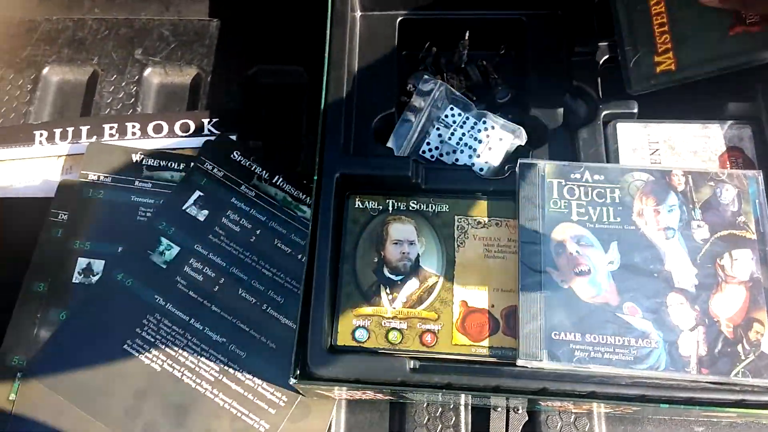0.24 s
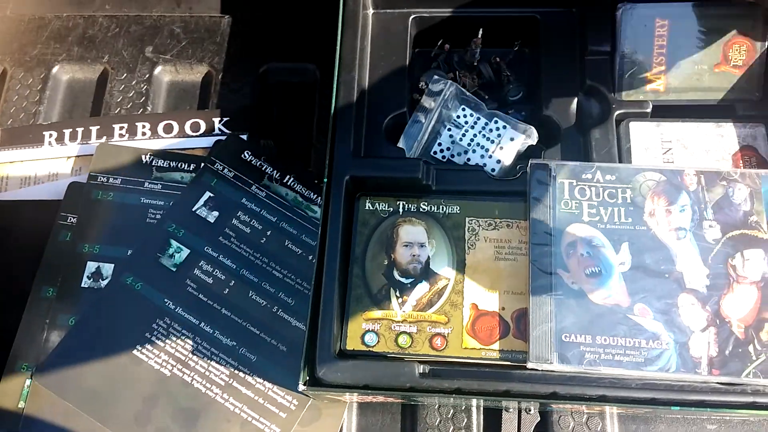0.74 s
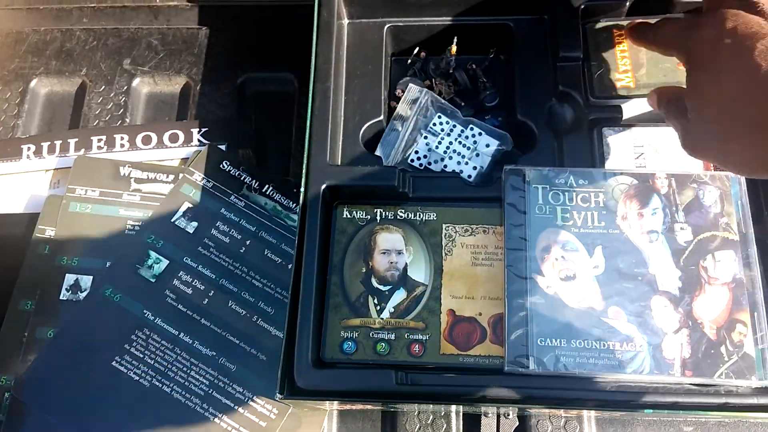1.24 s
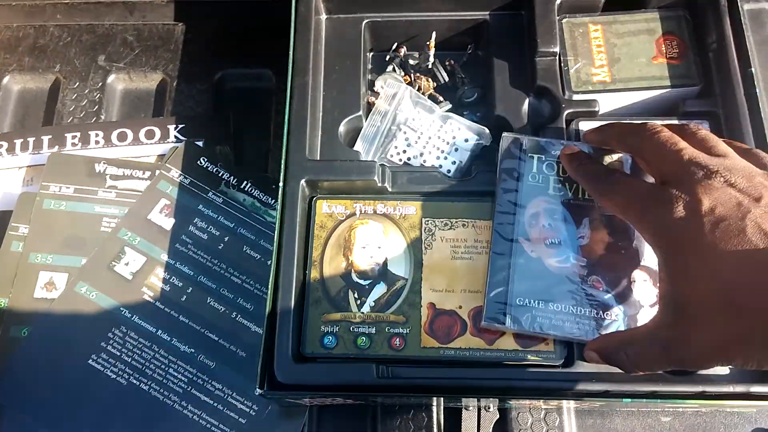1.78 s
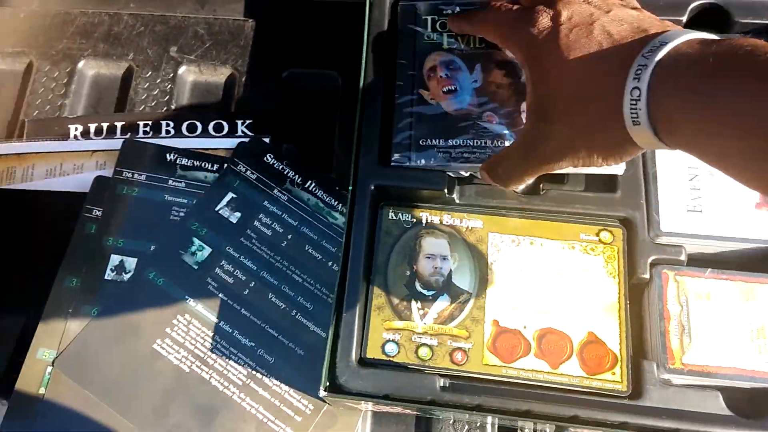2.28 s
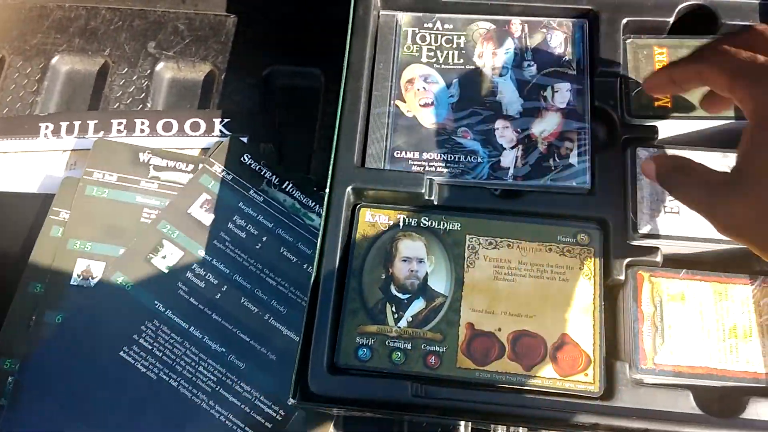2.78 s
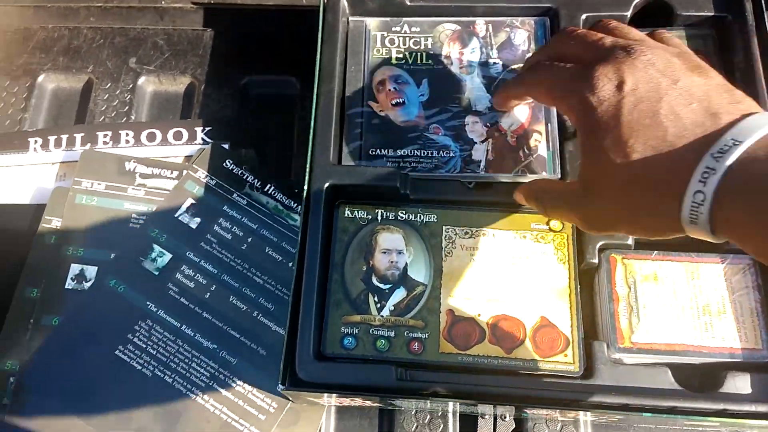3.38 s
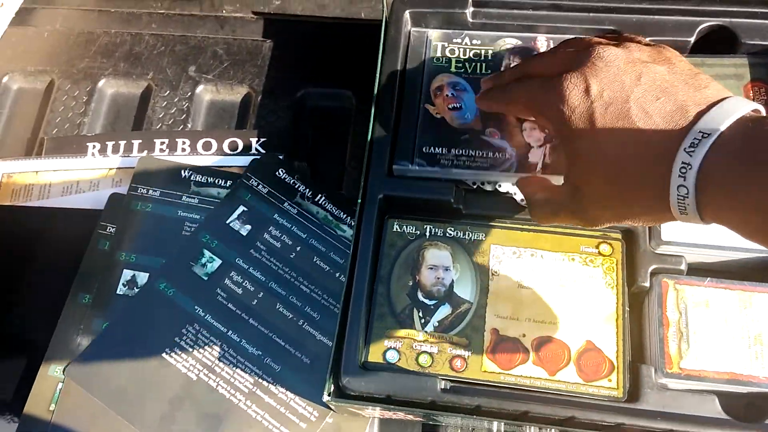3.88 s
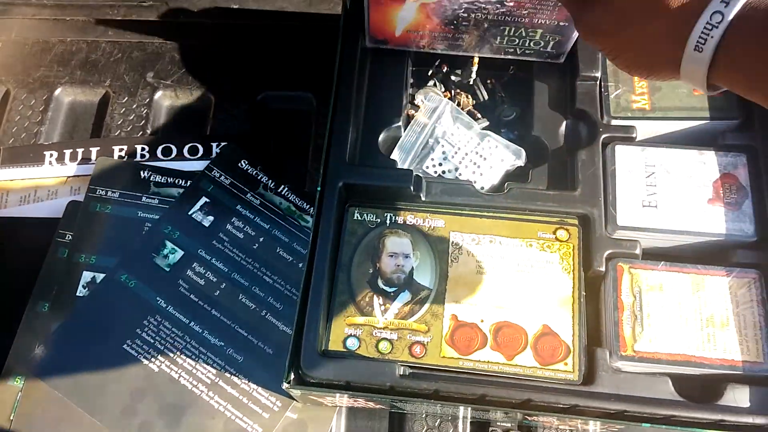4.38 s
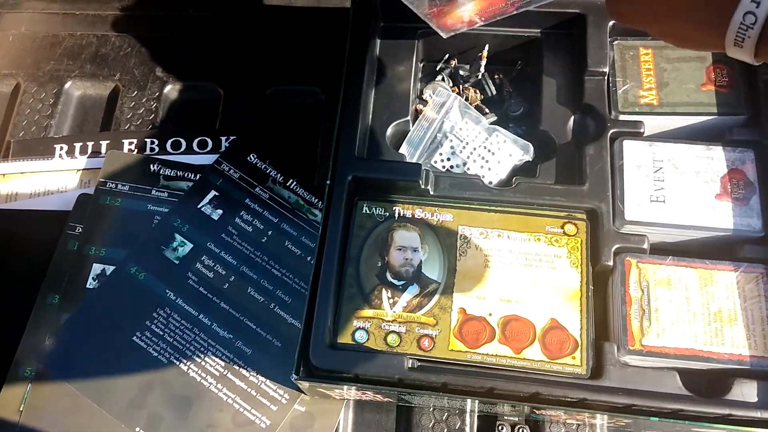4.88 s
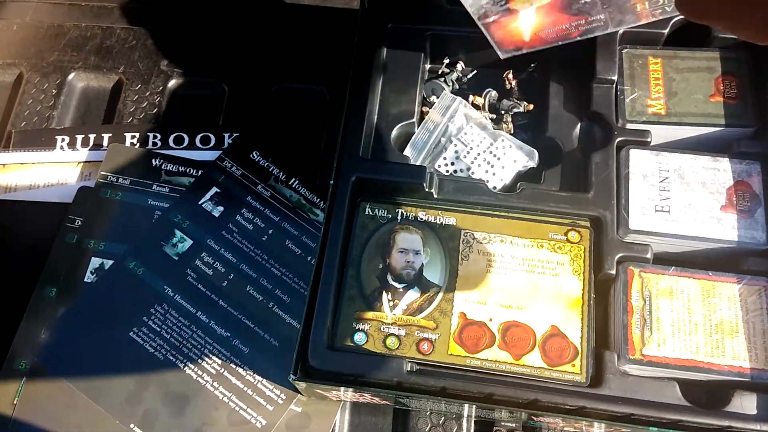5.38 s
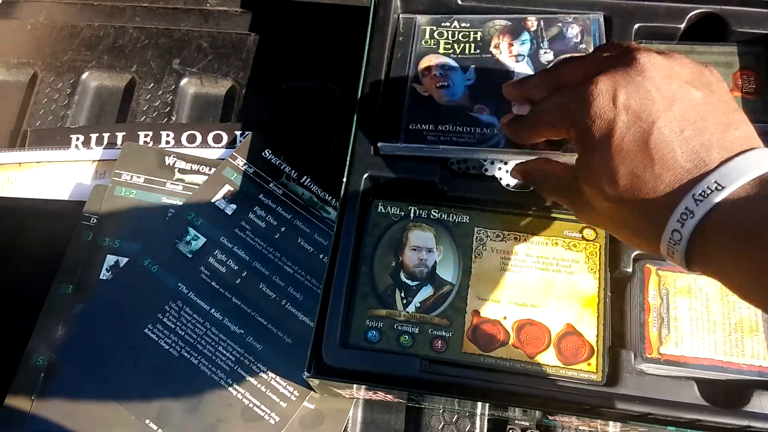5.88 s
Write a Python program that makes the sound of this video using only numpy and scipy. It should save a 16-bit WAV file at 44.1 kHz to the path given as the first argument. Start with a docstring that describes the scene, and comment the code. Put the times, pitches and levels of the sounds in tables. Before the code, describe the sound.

Hands shuffle cards and thin plastic in a box tray: sharp hollow knocks with bright snaps, dry rubbing, film crinkle, small ticks and brief squeaks. Activity comes in clusters, with a near pause midway and a dense, loud finish. Faint road noise and a few early bird chips sit far behind the close, slightly clipped phone pickup, stronger and brighter on the left.

```python
"""Card decks and a thin plastic case drop into a moulded tray outdoors, close to a phone: noisy chatter rings
tray modes, a low thump and a bright snap. Random slips make the rub, crinkle and ticks of fingers, cards and
film; gliding sines make the squeaks and the chips of a bird nearby. Far off, shaped noise gives traffic rumble,
tyre hiss and a low hum; the phone briefly turns rumble and hiss down now and then. The right microphone port
faces away and hears less, above all from about 1.4 to 3 kHz."""
import sys
import numpy as np
from scipy import signal
from scipy.fft import rfft, irfft
from scipy.io import wavfile
from scipy.ndimage import uniform_filter1d

SR = 44100
rng = np.random.default_rng(int(sys.argv[2]) if len(sys.argv) > 2 else 0)


def wav_record(signal):
    """Record a signal, one row per channel, as 16-bit PCM in the file named by sys.argv[1]."""
    frames = np.transpose(np.atleast_2d(signal))
    bounded = np.clip(frames, -1, 1)
    # unit amplitude maps onto the largest positive 16-bit level
    quanta = np.round(bounded * 32767).astype(np.int16)
    wavfile.write(sys.argv[1], SR, quanta)


N = 270774
T = np.arange(N) / SR


def undb(db):
    """Decibels to an amplitude factor."""
    return 10 ** (np.asarray(db) / 20)


def level(x, db):
    """Scale to an rms level."""
    return x * undb(db) / np.sqrt(np.mean(x ** 2))


def along(table, count):
    """Spread an (f/Hz, value) table over the bins of a transform, on a log frequency axis."""
    hz, value = np.transpose(table)
    bins_hz = np.fft.rfftfreq(count, 1 / SR)
    return np.interp(np.log(bins_hz + 1), np.log(hz), value)


def colour(x, gain):
    """Filter by one gain per frequency bin."""
    return irfft(rfft(x) * gain, N)


def band(x, hz, width):
    """One broad resonance."""
    return signal.lfilter(*signal.iirpeak(hz, hz / width, SR), x)


def humps(x, table, shift_db):
    """Broad treble resonances of thin plastic, steep at the sides; shift_db() varies each one."""
    out = 0
    for hz, width, db in table:
        resonance = band(band(x, hz, width), hz, 2 * width)
        out = out + undb(db + shift_db()) * resonance
    return out


def walk(rate):
    """Random levels, rate of them a second, slewed from one to the next; spread about 1.7."""
    k = int(SR / rate)
    held = np.repeat(rng.standard_normal(N // k + 1), k)
    return 2.08 * uniform_filter1d(held, k)[:N]


def add(out, x, s):
    """Mix a short sound in at time s."""
    i = int(s * SR)
    out[i:i + len(x)] += x[:N - i]


def whistle(s, times, hz, db):
    """A gliding sine under a soft arch."""
    t = T[:int(times[-1] * SR)]
    arch = np.sin(np.pi * t / times[-1])
    phase = 2 * np.pi * np.cumsum(np.interp(t, times, hz)) / SR
    return undb(db) * arch * np.sin(phase)


def slips(rate, spread_db):
    """Stick-slip: random clicks, rate of them a second on average, a few much larger than the rest."""
    clicks = (rng.random(N) < rate / SR) * rng.standard_normal(N)
    return clicks * undb(spread_db * np.minimum(rng.exponential(size=N), 3))


# the phone's noise suppression lets the background through, then briefly turns it down:
# (t/s, tyre hiss level/dB)
BACKGROUND = [(0, -44.5), (1.95, -46), (2.1, -58.5), (2.25, -45.5), (2.75, -44), (2.81, -54.5), (3.05, -44),
              (3.21, -55), (3.27, -50.5), (3.54, -55.5), (3.66, -45), (3.73, -67), (3.8, -44), (3.94, -57),
              (3.99, -47), (5.05, -46.5), (5.14, -53), (5.2, -47.5), (6.14, -43)]
RUMBLE_DB, RUMBLE_DIP = -42, 0.73  # rumble at the loudest; share of each dip (in dB) that it follows


def background_levels():
    """Rumble and tyre hiss levels in dB as the phone passes them; the rumble is turned down less deeply."""
    tyres_db = np.interp(T, *np.transpose(BACKGROUND))
    rumble_db = RUMBLE_DB + RUMBLE_DIP * (tyres_db - tyres_db.max())
    return rumble_db, tyres_db


# far road, spectrum shapes only: (f/Hz, relative level/dB per Hz)
RUMBLE = [(30, -9), (60, 13.5), (120, 12), (200, 2.5), (320, -26)]
TYRES = [(300, -6.5), (620, -11.5), (880, 2.5), (1150, -9), (1600, -8.5), (2500, -17.5), (16000, -48)]
# low hum at the start: (t/s by which it has faded, f/Hz, level/dB before the fade)
HUM = (0.23, 130, -31.5)


def traffic(rumble_db, tyres_db):
    """Far road: shaped noise for engine rumble and tyre hiss, narrow noise for a hum that wavers and fades."""
    rumble, tyres = (level(colour(rng.standard_normal(N), undb(along(shape, N))), 0) for shape in (RUMBLE, TYRES))
    end, hz, db = HUM
    fade = np.clip((end - T) / 0.028, 0, 1)
    hum = level(band(rng.standard_normal(N), hz, 1.3), db) * fade
    return rumble * undb(rumble_db) + tyres * undb(tyres_db) + hum


# bird nearby, one row a chip: (t/s, nominal start f/Hz, peak level/dB)
BIRD = [(0.069, 6000, -36), (0.17, 5030, -34), (0.269, 5070, -30.5), (0.372, 5100, -35.5),
        (0.472, 5280, -32), (0.81, 5240, -40)]
# the fall bends, then drops away: (t/s into the chip, nominal f/Hz)
CHIP = [(0.016, 4060), (0.026, 2800)]


def bird():
    """Falling chips, each pitched slightly differently, with a short scatter off the surroundings."""
    out = np.zeros(N)
    times, hz = np.transpose([(0.00054, 0)] + CHIP)  # the start pitch comes from BIRD
    for s, start_hz, db in BIRD:
        glide_hz = [start_hz, *hz[1:]] * (1 + 0.014 * rng.standard_normal(len(hz)))
        add(out, whistle(s, times, glide_hz, db), s)
    t = T[:8192]
    scatter = 0.016 * rng.standard_normal(len(t)) * 1000 ** (-t / 0.33)
    return out + signal.fftconvolve(out, scatter)[:N]


# close to the phone: (t/s, length/s, start f/Hz, end f/Hz, peak level/dB)
SQUEAKS = [(0.992, 0.068, 1290, 1500, -38.5), (1.203, 0.017, 2620, 2500, -34),
           (3.046, 0.021, 1680, 1820, -39.5)]


def squeaks():
    """A finger drags and the plastic sings briefly, gliding early and then holding its note."""
    out = np.zeros(N)
    for s, length, start_hz, end_hz, db in SQUEAKS:
        add(out, whistle(s, [0, 0.34 * length, length], [start_hz, end_hz, end_hz], db), s)
    return out


# fingers and cards slide over the plastic, close by, levels before the grip varies:
# (start t/s, swell/s, hold/s, rub level/dB, crinkle level/dB)
STROKES = [(0.447, 0.12, 0.1, -33, -43), (0.678, 0.071, 0.19, -37, -44), (1.047, 0.022, 0.013, -26, -32.5),
           (1.146, 0.034, 0.011, -35, -40), (1.289, 0.038, 0.039, -25.5, -39.5),
           (1.616, 0.014, 0.13, -40.5, -40.5), (1.771, 0.063, 0.12, -41, -38),
           (2.197, 0.16, 0.038, -35.5, -39), (2.43, 0.052, 0.16, -39, -40),
           (2.66, 0.043, 0.033, -66, -51.5), (2.972, 0.073, 0.056, -57, -53.5),
           (3.231, 0.0087, 0.0063, -48, -49), (3.56, 0.0087, 0.039, -51, -53.5),
           (3.785, 0.027, 0.048, -45.5, -52), (3.962, 0.04, 0.25, -40, -43.5),
           (4.463, 0.14, 0.022, -32.5, -37), (4.852, 0.039, 0.16, -45, -58),
           (5.143, 0.047, 0.18, -44, -53.5), (5.333, 0.12, 0.046, -37.5, -45.5),
           (5.53, 0.02, 0.13, -37.5, -45.5), (5.733, 0.042, 0.15, -39.5, -44),
           (5.917, 0.025, 0.34, -49, -45)]
SWELL_DB, RELEASE_DB_S = 15, 247  # growth over the swell (dB), fall after the hold (dB/s)


def strokes():
    """Rub and crinkle levels in dB: each stroke swells, holds and releases, and the powers add."""
    power = np.full((2, N), 1e-12)
    for s, swell, hold, rub_db, crinkle_db in STROKES:
        top = s + max(swell, 1e-3)
        end = top + max(hold, 1e-3)
        shape_db = np.interp(T, [s - .01, s, top, end, end + 1], [-99, -SWELL_DB, 0, 0, -RELEASE_DB_S])
        power += undb(shape_db + np.array([[rub_db], [crinkle_db]])) ** 2
    return 10 * np.log10(power)


# broad resonances of the film: (f/Hz, width/Hz, level/dB before it wanders)
FILM = [(4630, 3400, -1), (6760, 2700, -3), (12500, 7000, -16.5)]


def crinkle(db):
    """Sleeves and film rustle in the treble: slips through broad resonances, the colour wandering."""
    rustle = humps(slips(1500, 2.5), FILM, lambda: 2.5 * walk(40))
    return level(rustle, 0) * undb(db)


# mode clusters of the tray: (centre f/Hz, level/dB before random spread, t60/s)
TRAY = [(192.7, -12, 0.16), (265, -5.5, 0.024), (377, -0.5, 0.048), (671, -1.5, 0.04), (855, 1, 0.033),
        (1100, 6.5, 0.01), (1489, 3.5, 0.017), (1970, 11.5, 0.008), (2584, 6, 0.02), (3170, 7.5, 0.021),
        (4250, -2.5, 0.036)]


def ring(gain_db, t, which=slice(None)):
    """The tray's answer to one impulse; each listed mode is a cluster of six panel modes spread about it."""
    hz, db, t60 = (c[which, None, None] for c in np.transpose(TRAY))
    detune, size, turn = rng.standard_normal((3, len(hz), 6, 1))
    spread = 0.12 * np.linspace(-1, 1, 6)[:, None] + 0.028 * detune
    modes = np.cos(2 * np.pi * hz * (1 + spread) * t + 1.543 * turn) * 1000 ** (-t / t60)
    return np.sum(undb(db + gain_db[which, None, None] + 2.06 * size) * modes, (0, 1))


def rub(db):
    """Cards and fingers sliding drive the upper tray modes; as the contact moves, other modes answer."""
    drive = signal.lfilter(*signal.butter(2, 4000, fs=SR), slips(2500, 3.7))
    out, t, step = np.zeros(N), T[:1024], 3000  # a new contact every step samples
    low = np.array(TRAY)[:, 0] < 450
    for i in range(0, N, step):
        mode_db = -8 * low + 3 * rng.standard_normal(len(low))
        body = ring(mode_db, t) * 1000 ** (-t / 0.064)
        add(out, signal.fftconvolve(drive[i:i + step], body / np.linalg.norm(body)), i / SR)
    return level(out, 0) * undb(db)


# film, fingertips and card edges tick on the plastic, close by: (t/s, peak level/dB, f/Hz)
TICKS = [(0.916, -20, 1590), (1.154, -17.5, 2430), (1.6, -28.5, 8900), (1.67, -12.5, 2400),
         (1.79, -31, 7100), (1.872, -19.5, 3950), (1.995, -27, 12500), (2.14, -38, 11000),
         (2.212, -19.5, 6560), (2.275, -25, 13000), (2.42, -21.5, 2460), (2.451, -32, 9500),
         (2.492, -24.5, 6027), (2.715, -35.5, 12500), (4.003, -27.5, 4900), (4.011, -18, 3900),
         (4.033, -15, 3900), (4.131, -22.5, 850), (4.146, -20, 7600), (4.18, -20.5, 5300),
         (4.286, -25, 12500), (4.425, -25.5, 1000), (5.322, -19, 890), (5.438, -31, 11500),
         (5.452, -26, 5000), (5.566, -14, 1090), (5.813, -19.5, 920), (5.854, -17, 1480),
         (5.874, -23, 1900)]


def ticks():
    """Single short slips, each a dying noise in its own broad resonance."""
    out, t = np.zeros(N), T[:2048]
    for s, db, hz in TICKS:
        slip = rng.standard_normal(len(t)) * 1000 ** (-t / 0.023)
        tick = band(band(slip, hz, 1.23 * hz), hz, hz)
        add(out, tick / np.max(np.abs(tick)) * undb(db), s)
    return out


# a deck lands flat, settles, and the whole box answers: (t/s, level/dB before the decay)
BOOMS = [(1.349, -15.5), (1.42, -24)]


def booms():
    """The box floor rings low, its note sagging as it dies."""
    out, t = np.zeros(N), T[:8192]
    hz = 230 - 600 * t
    envelope = (1 - np.exp(-t / 0.0013)) * 1000 ** (-t / 0.3)
    note = envelope * np.sin(2 * np.pi * np.cumsum(hz) / SR)
    for s, db in BOOMS:
        add(out, undb(db) * note, s)
    return out


# blows on the tray, close to the phone: (t/s, clack peak level/dB before the bass cut, f/Hz that rings most,
# thump level/dB and snap level/dB against the clack, chatter t60/s before limits and the faster early decay)
KNOCKS = [(0.302, -4.5, 876, -13.5, -7, 0.13), (.437, -10, 1080, -6, -5.5, 0.37),
          (.466, -5, 778, -13.5, -46, 0.09), (.549, -2.5, 743, -7.5, -15.5, 0.28),
          (0.593, -5, 686, -14.5, -46, 0.11), (0.652, -16.5, 1510, -18, -1, 0.16),
          (0.739, -6, 935, -13.5, -3, 0.23), (.771, -4, 657, -9.5, -45, 0.14),
          (1.055, -16, 993, -31.5, -41, 0.39), (1.33, -12.5, 650, -34, -10, 0.2),
          (1.352, -3.5, 495, -5.5, -4.5, 0.19), (1.629, -18.5, 1300, -28, -1, 0.053),
          (1.724, -10, 960, -31.5, -2, 0.061), (2.256, -16.5, 730, -39, -18, 0.18),
          (2.275, -13, 720, -42, -15, 0.084), (2.295, -2, 700, -46, -3.5, 0.11),
          (2.348, -12, 890, -20.5, -4, 0.23), (2.522, -4.5, 1110, -9.5, -0.5, 0.13),
          (2.555, -2, 480, -22, -3, 0.07), (2.568, -6, 1190, -7.5, 0, 0.2),
          (3.792, -19.5, 1280, -18, -4, 0.086), (4.07, -12, 653, -11.5, -3.5, 0.054),
          (4.288, -19.5, 875, -25, 4, 0.27), (4.6, -20, 870, -1, 2.5, 0.35),
          (4.638, -7, 664, -27, -10, 0.089), (4.662, -16, 675, -27, -5, 0.087),
          (4.847, -14, 810, -6.5, -5, 0.23), (5.163, -17.5, 1525, -21, -49, 0.28),
          (5.336, -11.5, 847, -39, -45, 0.077), (5.54, -4, 920, -14.5, -0.5, 0.083),
          (5.603, -6, 603, -33, 1.5, 0.083), (5.675, -14.5, 790, -14, 4.5, 0.22),
          (5.682, -8, 640, -10.5, -35, 0.025), (5.757, -6, 900, -45, 2, 0.048),
          (5.778, -11.5, 813, -28, -0.5, 0.4), (6.039, -14.5, 496, -9, 0, 0.15),
          (6.047, -2.5, 553, -36, -6.5, 0.091), (6.079, 1.5, 726, -12, -3.5, 0.22),
          (6.099, -7, 492, -8, 2, 0.41), (6.126, -8.5, 1060, -3, -32, 0.23)]
# treble resonances of the snapping edges: (f/Hz, width/Hz, level/dB before each blow varies it)
SNAP = [(3830, 2600, 20.5), (5960, 2200, 6), (14100, 10400, -2.5)]


def knocks():
    """Each blow is a first contact and a dying chatter; where it lands sets which modes ring."""
    out, t, hz = np.zeros(N), T[:6144], np.array(TRAY)[:, 0]
    low = hz < 450
    soft, dull = signal.butter(3, 6000, fs=SR), signal.butter(1, 2500, fs=SR)
    for s, peak_db, pitch_hz, thump_db, snap_db, t60 in KNOCKS:
        chatter = rng.standard_normal(len(t)) * undb(1.46 * rng.standard_normal(48)).repeat(128)
        chatter *= (1 - np.exp(-t / 0.00089)) * 1000 ** (-t / np.clip(t60, .01, .4))
        # the first bounces are hard and bright, the later chatter duller
        push = 3.32 * np.exp(-t / 0.011) * chatter + 1.91 * signal.lfilter(*dull, chatter)
        push[32] += 24  # first contact
        # the walls feel a rounded push; the edges snap at the raw one
        felt = signal.lfilter(*soft, push)
        near_db = -7.5 * np.abs(np.log2(hz / pitch_hz))
        # the panel right under the blow
        panel = undb(7.5) * np.sin(2 * np.pi * pitch_hz * t) * 1000 ** (-t / 0.035)
        thump_body = ring(0 * hz, t[:4096], low)
        clack_body = ring(near_db, t[:4096], ~low) + panel[:4096]
        thump, clack = (signal.fftconvolve(felt, body)[:len(t)] for body in (thump_body, clack_body))
        snap = humps(push, SNAP, lambda: 3 * rng.standard_normal())
        parts = (thump, thump_db), (clack, 0), (snap, snap_db)
        blow = sum(undb(db) * part / np.max(np.abs(part)) for part, db in parts)
        add(out, undb(peak_db) * blow, s - T[32])
    # a small tray sends no deep bass
    return signal.sosfilt(signal.butter(2, 130, "high", fs=SR, output="sos"), out)


# the two microphone ports: (f/Hz, left minus right level/dB, before the two are blended)
PORTS_DB = [(30, 4.5), (700, 3), (1400, 11), (3000, 15), (10000, 7), (16000, 4)]
# how far the ports agree: (f/Hz, share of power heard alike)
PORTS_ALIKE = [(30, 0.26), (200, 1), (800, 0.61), (2500, 0.031), (16000, 0.18)]
PORTS_LAG_S = .00005


def ports(near, round_about):
    """The right port hears part of the same sound a little late, the rest from other faces of the objects."""
    tilt = undb(-along(PORTS_DB, N))
    alike = np.clip(along(PORTS_ALIKE, N), 0, 1)
    lag = np.exp(-2j * np.pi * np.fft.rfftfreq(N, 1 / SR) * PORTS_LAG_S)
    # the gains of the shared sound average 1 over the two ports
    left = 2 / (1 + np.sqrt(alike) * tilt)
    right = left * tilt
    shared = colour(near, right * np.sqrt(alike) * lag)
    own = colour(round_about, right * np.sqrt(1 - alike))
    return np.array([colour(near, left), shared + own])


HISS_DB = -19  # treble hiss of the background, relative to the tyre hiss


def scene():
    """Mix the same events twice with independent random detail, as two faces for the two ports."""
    rub_db, crinkle_db = strokes()
    rumble_db, tyres_db = background_levels()
    # the background's treble hiss shares the crinkle's sound
    crinkle_db = 10 * np.log10(undb(crinkle_db) ** 2 + undb(tyres_db + HISS_DB) ** 2)
    # the grip changes from moment to moment
    grip_db = 1.6 * walk(70)
    faces = []
    for _ in range(2):
        distant = traffic(rumble_db, tyres_db) + bird()
        sliding = squeaks() + crinkle(crinkle_db + grip_db) + rub(rub_db + grip_db)
        blows = ticks() + booms() + knocks()
        faces.append(distant + sliding + blows)
    return ports(*faces)


TOP_HZ = 16000


def record(dry):
    """The phone clips the loudest blows and cuts the top."""
    clipped = np.clip(dry, -.98, .98)
    return signal.sosfilt(signal.ellip(10, .2, 60, TOP_HZ, fs=SR, output="sos"), clipped)


dry = scene()
out = record(dry)
wav_record(out)
```